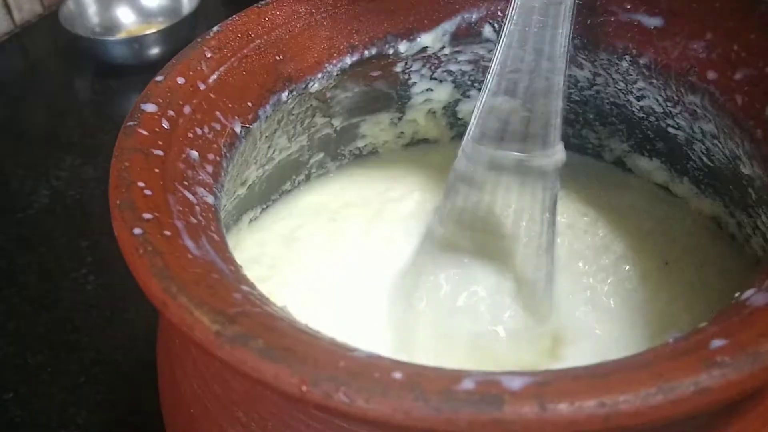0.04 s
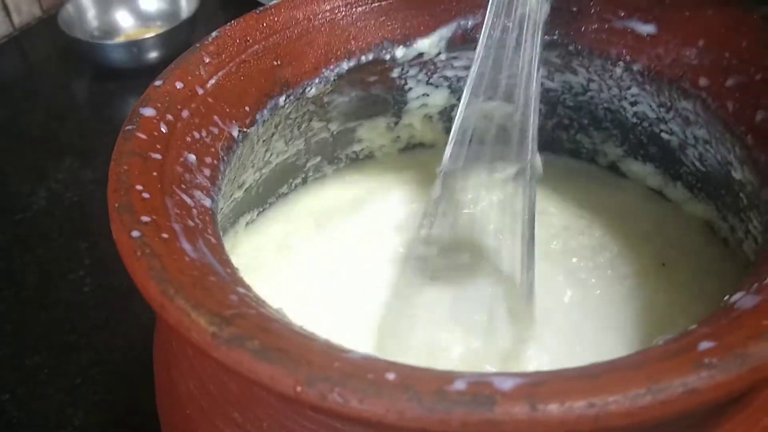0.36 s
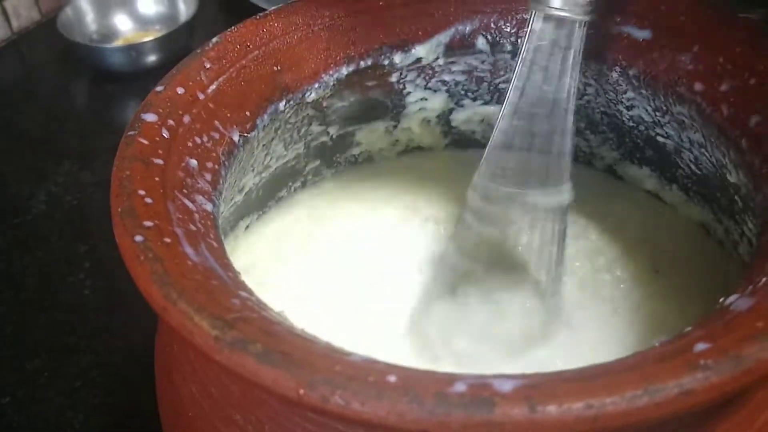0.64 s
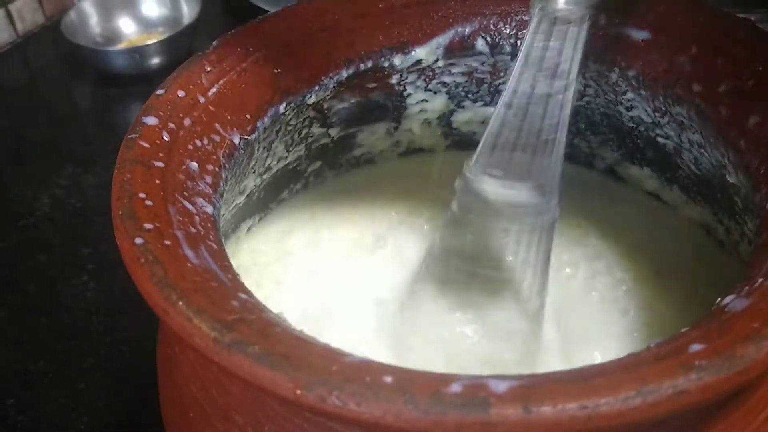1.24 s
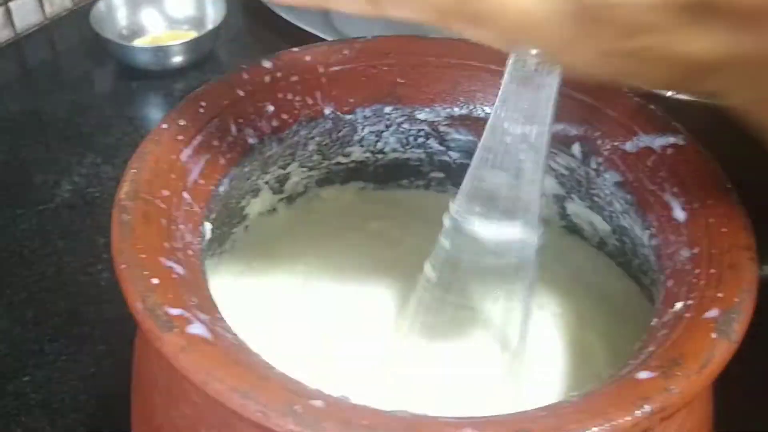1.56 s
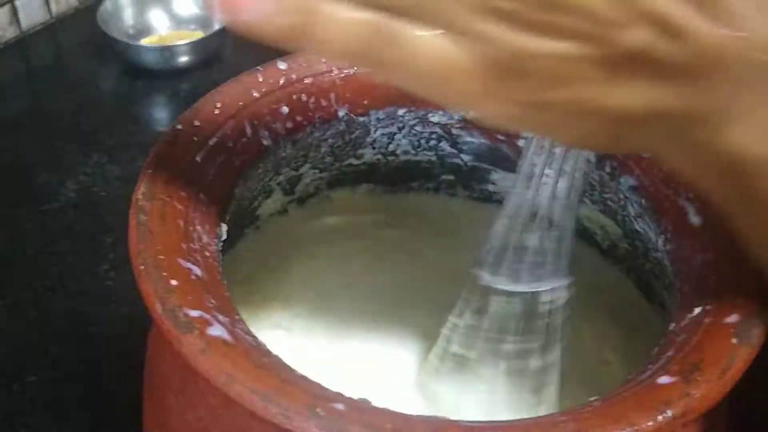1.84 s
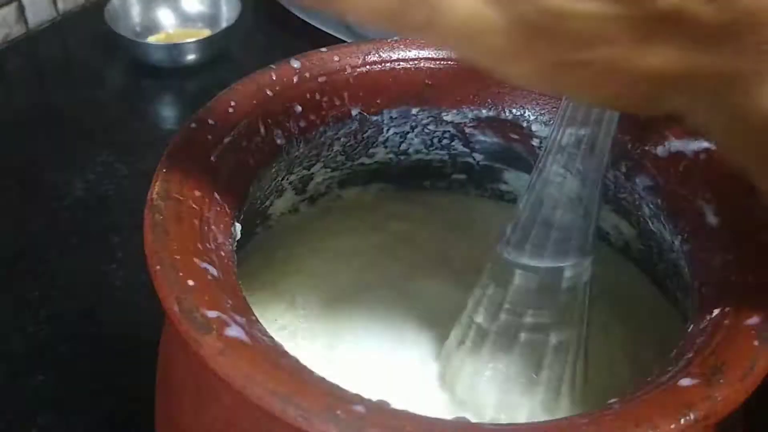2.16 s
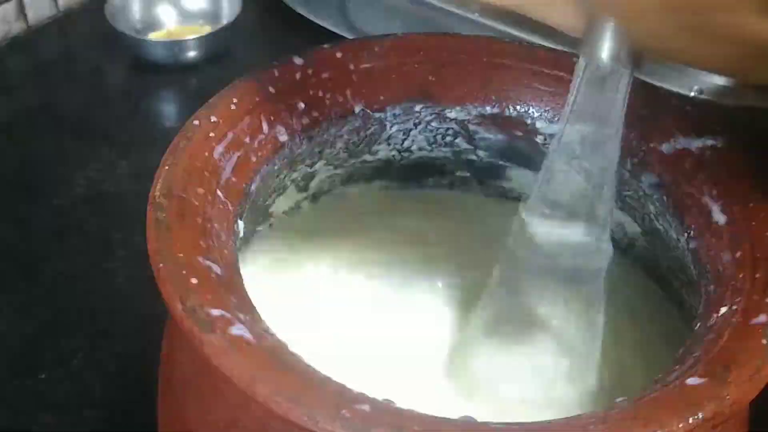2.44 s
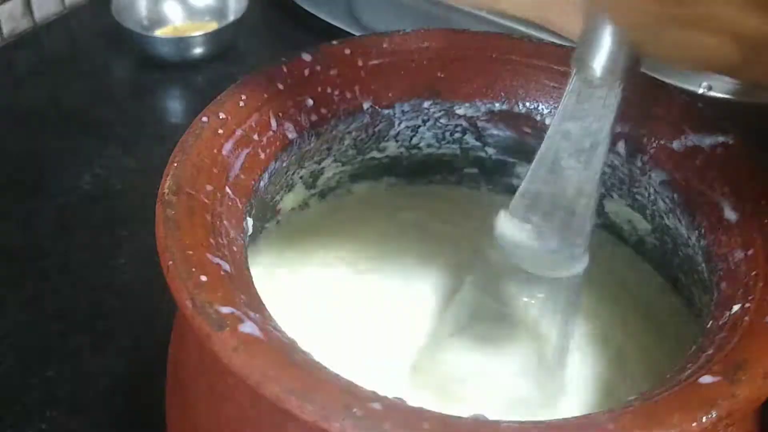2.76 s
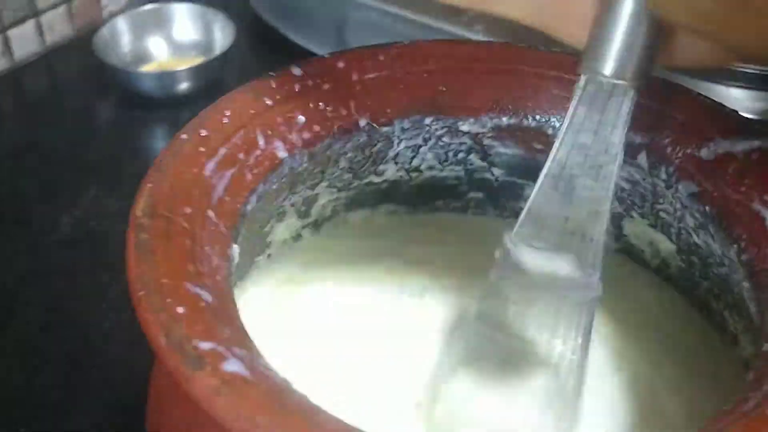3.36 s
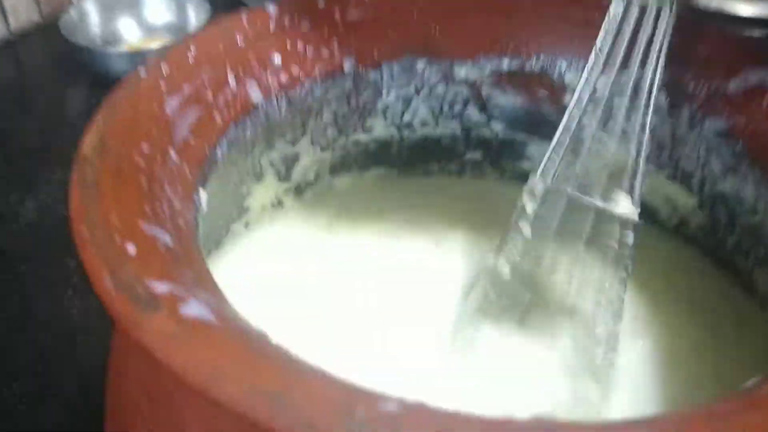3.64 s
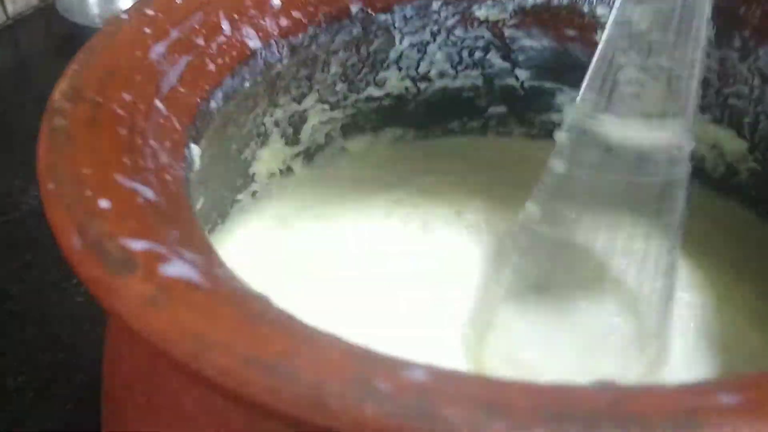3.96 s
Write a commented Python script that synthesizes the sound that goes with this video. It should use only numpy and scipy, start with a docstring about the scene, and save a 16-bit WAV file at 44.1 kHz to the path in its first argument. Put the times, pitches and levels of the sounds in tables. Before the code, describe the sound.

A whisk churns liquid in a clay pot with quick, wet swishes and small bubbles.

```python
"""A wire whisk, spun to and fro between the palms, churns buttermilk in a clay pot, about six strokes a second.
Each stroke sloshes the liquid, whips up a froth of small bubbles and flings fine spray.
Single bubbles plink, chirp and plop on top, and the wires tick against the clay.
The pot rings faintly, close to a stereo microphone, over a quiet kitchen room tone.
The sound cuts out briefly and resumes a little slower."""
import sys
import numpy as np
from scipy import signal
from scipy.fft import rfft, irfft
from scipy.io import wavfile

SR = 44100
rng = np.random.default_rng(int(sys.argv[2]) if len(sys.argv) > 2 else 0)


def inscribe(sig):
    """Save sig as 16-bit PCM at rate SR to the path in sys.argv[1].

    A 1-D sig is mono; a 2-D sig holds one channel per row.
    Samples are clipped to [-1, 1] before scaling.
    """
    pcm = np.round(np.clip(np.atleast_2d(sig).T, -1, 1) * 32767)
    wavfile.write(sys.argv[1], SR, pcm.astype(np.int16))


N = 176400

# whisk strokes (centre time [s], slosh level [dB], froth level [dB], spray level [dB])
STROKES = [(0.024, -44, -35, -50), (0.167, -45, -39.5, -51), (0.277, -46, -35.5, -49),
           (0.421, -50, -37, -50.5), (0.543, -46.5, -36, -47.5), (0.696, -50, -47, -56.5),
           (0.809, -52.5, -39.5, -54), (0.929, -54.5, -39, -52.5), (1.048, -49.5, -41, -51),
           (1.177, -50, -41, -51.5), (1.303, -51, -38, -48.5), (1.408, -55, -44.5, -59),
           (1.82, -54.5, -47, -59), (1.995, -59, -46.5, -54), (2.171, -55, -46, -52.5),
           (2.356, -52.5, -43, -49.5), (2.523, -54.5, -38, -47.5), (2.689, -50.5, -42.5, -48.5),
           (2.846, -54, -42, -45.5), (3.014, -63.5, -44.5, -57.5), (3.156, -54.5, -47.5, -51.5),
           (3.311, -53.5, -43, -57), (3.474, -54, -38.5, -46.5), (3.617, -60, -42.5, -56),
           (3.77, -50.5, -41, -55), (3.92, -50.5, -37, -48.5)]
# small bubbles bursting at the wires (time [s], level [dB], pitch [Hz])
PLINKS = [(0.3001, -22, 3144), (0.682, -29, 2680), (0.7826, -26, 3200), (1.023, -28.5, 3050),
          (1.1746, -21, 3790), (2.334, -25, 3140), (2.531, -22, 3210), (2.5593, -27, 3370),
          (3.3367, -32.5, 3460), (3.642, -29, 2616), (3.6925, -29.5, 2540)]
# surfacing bubbles (time [s], level [dB], start pitch [Hz], rise per decay time [fraction])
CHIRPS = [(2.117, -33, 1823, 0.67), (2.443, -36.5, 770, 0.21), (3.184, -39, 800, 0.2),
          (3.4, -35.5, 1192, 0.073), (3.506, -30.5, 1025, 0.043)]
# air pockets closing behind the whisk (time [s], level [dB], start pitch [Hz], decay time [s])
PLOPS = [(.04, -41, 600, 0.046), (.261, -22, 897, 0.0017), (.278, -37.5, 608, 0.026),
         (.555, -36.5, 548, 0.023), (.883, -33.5, 930, 0.0038), (.935, -38.5, 775, 0.048),
         (1.054, -30.5, 1258, 0.0044), (1.074, -36.5, 671, 0.025), (1.268, -35, 825, 0.012),
         (1.313, -36, 711, 0.0098), (2.553, -40.5, 673, 0.024)]
# wires ticking on the pot and snapping through the surface (time [s], level [dB], pitch [Hz])
TICKS = [(.555, -26, 5340), (1.768, -36, 4630), (1.8075, -30.5, 3010), (1.891, -42, 5670),
         (1.963, -27, 5260), (2.835, -23.5, 3800), (2.880, -31, 3420), (3.001, -27.5, 3070),
         (3.9063, -32.5, 3270)]
# EQ curves of the three liquid layers and the room tone (frequency [Hz], gain [dB])
SLOSH_EQ = [(100, -55), (420, -3), (540, -7), (1250, 5), (1650, -1.5), (4000, -26)]
FROTH_EQ = [(100, -15), (1800, -11), (2500, 0.5), (3250, 2), (4400, -3.5), (5400, -5.5), (6400, -15),
            (9000, -26.5)]
SPRAY_EQ = [(300, -28.5), (5000, 7), (8200, -2.5), (11000, -2.5), (15000, -22)]
KITCHEN_EQ = [(25, -25), (120, 4.5), (350, -3.5), (2000, -24.5), (15000, -57.5)]
# air resonances of the pot (pitch [Hz], gain [dB], T60 [s])
POT_MODES = [(330, -24, 0.15), (570.3, 2, 0.15), (860, -16, 0.28), (1293, -4, 0.088)]
# sound arriving directly, not scattered by the pot wall (frequency [Hz], power share [0-1])
DIRECT_SHARE = [(200, 0.95), (600, 1), (1350, 0.87), (3200, 0.94), (5400, 1), (10000, 0.02)]
# stereo spread of the direct sound (frequency [Hz], left minus right phase [rad])
STEREO_PHASE = [(1380, 0), (2070, 3.3), (2410, 2.9), (2930, 6.6), (3700, 6.1), (5680, -0.5), (9000, 10.9)]
# the highs lean left (frequency [Hz], left minus right level [dB])
STEREO_BALANCE = [(4000, 1), (6500, 2.5), (9500, 8.5)]

STROKE_EDGE = 3.08  # higher = harder attack and release
PITCH_WAVER = 0.08  # rough depth of a large bubble's wobble, as a fraction of its pitch
DEEP_HZ, DEEP_WIDTH_HZ, DEEP_SEND_DB = 840, 300, 3.5  # band layered onto the early slosh
WALL_T60_S, ROOM_T60_S, ROOM_SEND_DB = 0.045, 0.15, -7.5
MUTE_FROM_S, MUTE_TO_S, MUTE_FADE_S = 1.417, 1.737, 0.0051
HIGH_CUT_HZ = 15200


def amp(db):
    """Decibels to gain."""
    return 10 ** (np.asarray(db) / 20)


def unit(x):
    """Normalises to rms 1."""
    return x / np.sqrt(np.mean(x ** 2))


def curve(points):
    """Draws a (frequency [Hz], value) table across the whole spectrum."""
    hz, value = np.transpose(points)
    return np.interp(np.log1p(np.fft.rfftfreq(N, 1 / SR)), np.log1p(hz), value)


def eq(x, points):
    """Shapes the tone with an EQ curve."""
    return irfft(rfft(x) * amp(curve(points)), N)


def band(x, hz, width_hz):
    """Keeps a bell-shaped band around hz."""
    return irfft(rfft(x) * np.exp(-((np.fft.rfftfreq(N, 1 / SR) - hz) / width_hz) ** 2), N)


def add(mix, s, sound):
    """Drops a sound into the mix at time s."""
    part = mix[round(s * SR):][:len(sound)]
    part += sound[:len(part)]


def wander(per_s):
    """A random modulator that slides to a new value per_s times a second."""
    return np.interp(np.arange(N) / SR * per_s, np.arange(N), rng.standard_normal(N))


def room_tone():
    """A faint low kitchen bed, mostly out of phase between the channels."""
    shared, own = rng.standard_normal((2, N))
    noise = np.array([own / 2 + shared, own / 2 - shared])
    return amp(-62) * unit(eq(noise, KITCHEN_EQ))


def hollow_hum(centre_s=3.243, width_s=0.16, hz=355, width_hz=75, steady=0.42):
    """A faint hum near the pot's lowest pitch swells once."""
    swell = steady + np.exp(-((np.arange(N) / SR - centre_s) / width_s) ** 2)
    return amp(-63) * unit(band(rng.standard_normal(N), hz, width_hz)) * swell


def reverb(x, t60):
    """A dying tail of random reflections, different for each ear."""
    t = np.arange(SR // 2) / SR
    tail = rng.standard_normal((2, len(t))) * np.exp(-np.log(1000) * t / t60)
    return signal.fftconvolve(x[None], tail / np.linalg.norm(tail[0]))[:, :N]


def pot_resonance(x):
    """The air in the pot rings on at its modes, adding a hollow body."""
    t = np.arange(SR // 2) / SR
    ring = np.zeros(len(t))
    for hz, db, t60 in POT_MODES:
        damping = np.log(1000) / t60
        ring += amp(db) * 2 * damping / SR * np.exp(-damping * t) * np.cos(2 * np.pi * hz * t)
    return x + signal.fftconvolve(x, ring)[:N]


def noise_burst(db, decay_s):
    """The short noisy transient of a splash or click."""
    t = np.arange(SR // 20) / SR
    return amp(db) * np.exp(-t / decay_s) * rng.standard_normal(len(t))


def ping(hz, rise_s, decay_s, glide=0, waver=0):
    """A damped sine: glide lifts the pitch per decay time, waver wobbles it as a bubble deforms."""
    t = np.arange(0, 7 * decay_s + rise_s, 1 / SR)
    envelope = (1 - np.exp(-(t / rise_s) ** 2)) * np.exp(-t / decay_s)
    wobble = waver * wander(per_s=260)[:len(t)] if waver else 0
    pitch = hz * (1 + glide * t / decay_s + wobble)
    return envelope / envelope.max() * np.sin(2 * np.pi * np.cumsum(pitch) / SR)


def wire_ticks():
    """A wire strikes the wet clay: a bright click and a short ping."""
    clicks, pings = np.zeros((2, N))
    for s, db, hz in TICKS:
        add(clicks, s, noise_burst(db - 5, decay_s=0.0018))
        add(pings, s, amp(db) * ping(hz, rise_s=0.00049, decay_s=0.0015))
    return eq(clicks, SPRAY_EQ) / 2 + eq(clicks, FROTH_EQ) + pings


def single_bubbles():
    """Lone bubbles ring out of the churn as plinks, chirps and gurgling plops."""
    tones, gurgles = np.zeros((2, N))
    for s, db, hz in PLINKS:
        add(tones, s, amp(db) * ping(hz, rise_s=0.0016, decay_s=0.0028, glide=0.016))
    for s, db, hz, glide in CHIRPS:
        add(tones, s, amp(db) * ping(hz, rise_s=0.0033, decay_s=0.005, glide=glide, waver=PITCH_WAVER))
    for s, db, hz, decay_s in PLOPS:
        add(tones, s, amp(db) * ping(hz, rise_s=0.001, decay_s=decay_s, glide=0.02, waver=PITCH_WAVER))
        add(gurgles, s, noise_burst(db - 0.5, decay_s))
    return tones + eq(gurgles, SLOSH_EQ)


def bubble_cloud(low_hz, high_hz, per_s, cycles, spread_db=0, glide=0, pitches=40):
    """A steady texture of randomly triggered bubbles; cycles scales how long each rings."""
    cloud = np.zeros(N)
    for hz in np.geomspace(low_hz, high_hz, pitches):
        chance, size = rng.random((2, N))
        accent_db = spread_db * np.minimum(-np.log(size), np.pi)
        triggers = (chance < per_s / pitches / SR) * amp(accent_db)
        decay_s = cycles * rng.uniform(1.0, 2.96) / hz
        grain = ping(hz, decay_s / 2, decay_s, glide) * np.sqrt(hz / decay_s)
        cloud += signal.oaconvolve(triggers, grain)[:N]
    return unit(cloud)


def flutter(per_s, depth_db):
    """The level jumps unevenly as the wires cut the surface one after another."""
    return unit(amp(2 * depth_db * np.tanh(wander(per_s) / 2)))


def stroke_envelope(levels_db, width_s, linger_db, lag_s=0, linger_s=0.11):
    """Each stroke bites, holds and lets go; the liquid keeps stirring in between."""
    t = np.arange(0, N, 32) / SR
    from_centre_s = t[:, None] - np.transpose(STROKES)[0] - lag_s
    push = np.exp(-abs(2 * from_centre_s / width_s) ** STROKE_EDGE)
    linger = amp(linger_db) ** 2 * np.exp(-(from_centre_s / linger_s) ** 2)
    power = (push + linger) @ amp(levels_db) ** 2
    return np.interp(np.arange(N) / SR, t, np.sqrt(power))


def spray(levels_db):
    """The top end: tiny droplets land all over the pot, so each ear hears its own spatter."""
    drops = np.array([bubble_cloud(2000, 14000, per_s=3300, cycles=0.77) for _ in "LR"])
    fizz = unit(eq(drops + rng.standard_normal((2, N)) / 2, SPRAY_EQ))
    fizz *= flutter(per_s=120, depth_db=3.5)
    return fizz * stroke_envelope(levels_db, width_s=0.087, linger_db=-18.5)


def slosh(levels_db):
    """The body: large bubbles and churning liquid, deeper during the quick early strokes."""
    bubbles = bubble_cloud(442.7, 1703, per_s=420, cycles=2.904, spread_db=0.5, glide=0.1204)
    churn = eq(bubbles + rng.standard_normal(N) / 2, SLOSH_EQ)
    deep = churn + amp(DEEP_SEND_DB) * band(churn, DEEP_HZ, DEEP_WIDTH_HZ)
    body = np.where(np.arange(N) / SR < MUTE_TO_S, unit(deep), unit(churn))
    body *= flutter(per_s=70, depth_db=3.5)
    return body * stroke_envelope(levels_db, width_s=0.081, linger_db=-5.5)


def froth(levels_db):
    """The lead layer: the wires whip up small bubbles in a wet swish."""
    bubbles = bubble_cloud(1703, 8480, per_s=1700, cycles=3.5, spread_db=6.5)
    hiss = amp(-3.5) * rng.standard_normal(N)
    swish = unit(eq(bubbles + hiss, FROTH_EQ)) * flutter(per_s=140, depth_db=2)
    return swish * stroke_envelope(levels_db, width_s=0.062, linger_db=-15.5, lag_s=-0.011)


def scene():
    """The whisking rings through the pot and reaches the microphone directly and by reflection."""
    _, slosh_db, froth_db, spray_db = np.transpose(STROKES)
    whisking = slosh(slosh_db) + froth(froth_db) + single_bubbles() + wire_ticks()
    pot = pot_resonance(whisking) + hollow_hum()
    share = np.clip(curve(DIRECT_SHARE), 0, 1)
    sides = np.array([[0.5], [-0.5]])  # left, right
    direct = np.sqrt(share) * rfft(pot) * np.exp(1j * sides * curve(STEREO_PHASE))
    scattered = np.sqrt(1 - share) * rfft(reverb(pot, WALL_T60_S))
    room = amp(ROOM_SEND_DB) * rfft(reverb(pot, ROOM_T60_S))
    spectrum = direct + scattered + room + rfft(spray(spray_db))
    return irfft(spectrum * amp(sides * curve(STEREO_BALANCE)), N) + room_tone()


def record(dry):
    """The mix mutes for a moment, and a steep high cut trims the very top."""
    t = np.arange(N) / SR
    fade = np.exp(-np.maximum(t - MUTE_FROM_S, 0) / MUTE_FADE_S)
    gate = np.where(t < MUTE_TO_S, fade, 1)
    lowpass = signal.firwin(511, HIGH_CUT_HZ, window=("kaiser", 9), fs=SR)
    return signal.oaconvolve(dry * gate, lowpass[None], "same")


dry = scene()
out = record(dry)
inscribe(out)
```